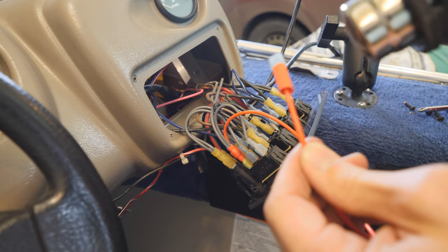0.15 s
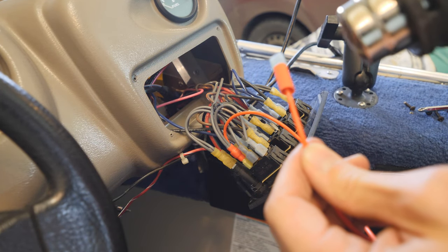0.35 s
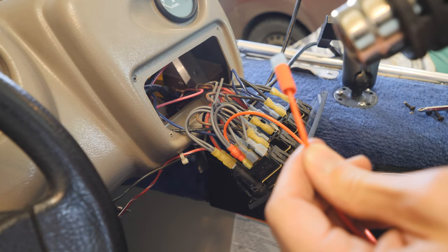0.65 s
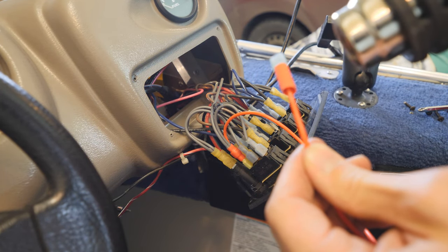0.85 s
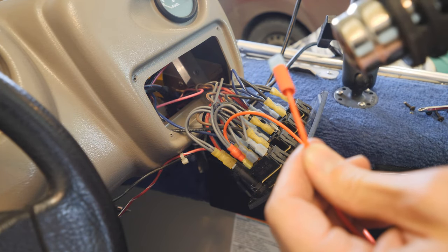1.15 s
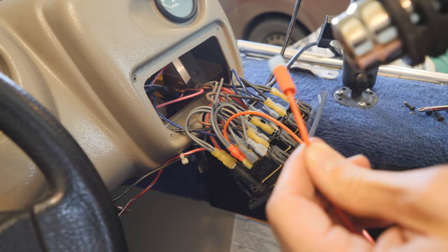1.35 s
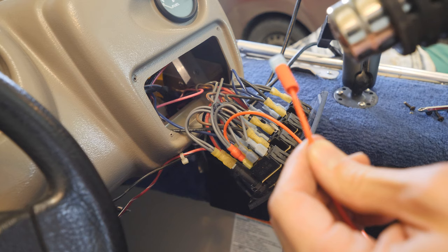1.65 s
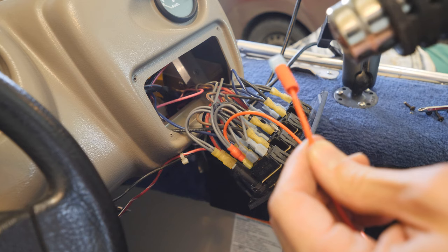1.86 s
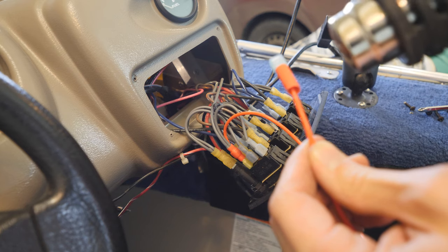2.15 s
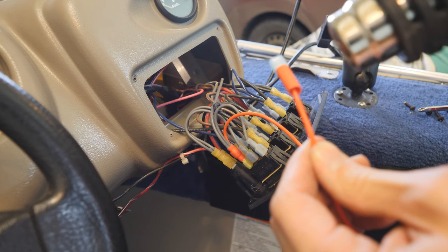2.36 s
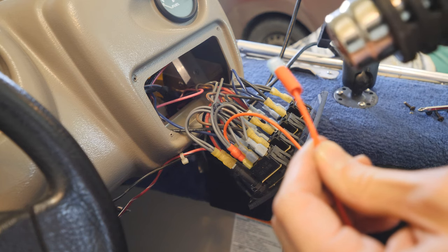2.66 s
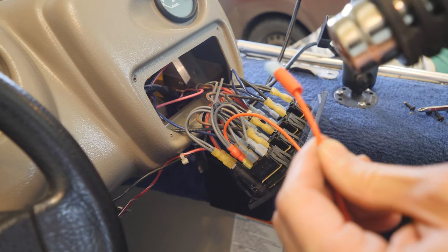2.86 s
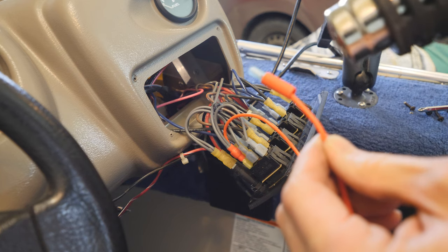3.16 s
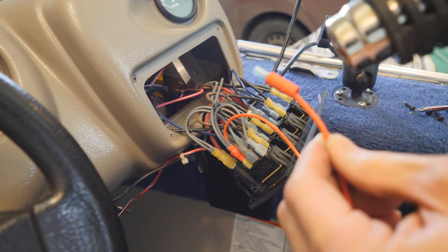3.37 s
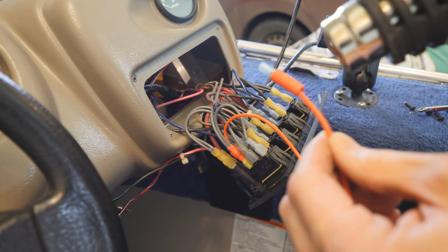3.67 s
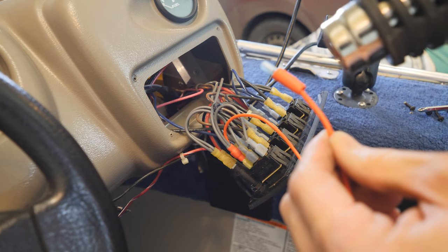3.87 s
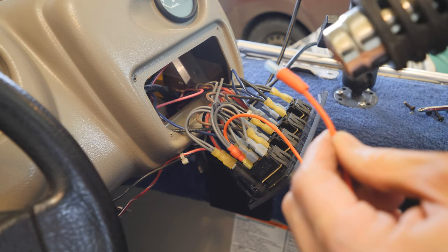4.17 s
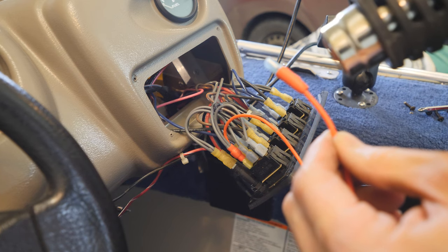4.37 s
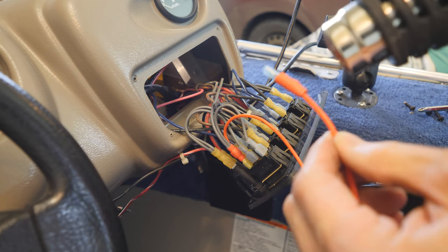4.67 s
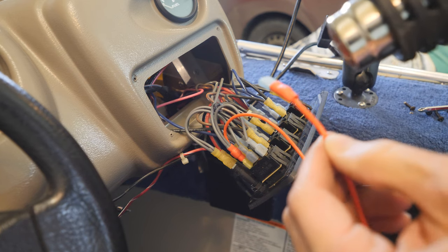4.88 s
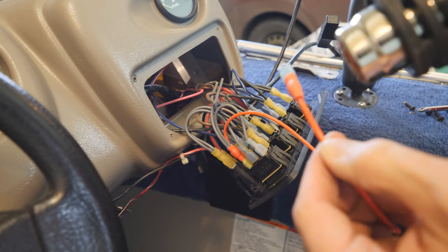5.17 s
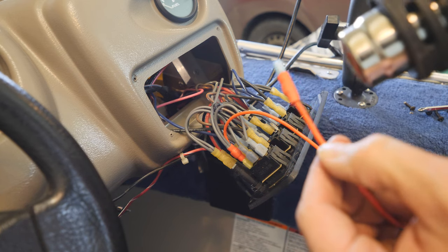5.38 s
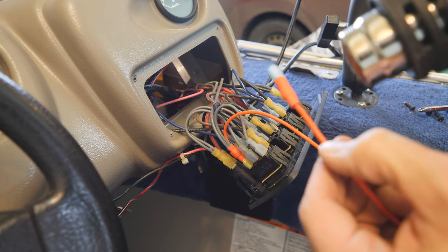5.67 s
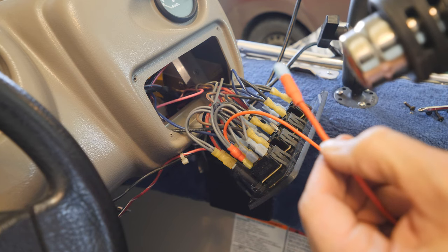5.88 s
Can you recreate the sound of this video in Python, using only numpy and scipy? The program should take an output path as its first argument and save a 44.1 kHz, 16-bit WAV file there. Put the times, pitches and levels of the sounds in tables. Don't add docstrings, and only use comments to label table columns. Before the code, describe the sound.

A hand-held heat gun, just switched on, blows close to the microphone in a boat cockpit. Its broad, breathy rush swells while a buzzy motor whine glides upward, quickly at first and then more slowly. Midway the nozzle turns away and the whine softens and changes colour, returning as it points back. The sound is dry, close, practically mono and continuous to the end.

```python
import sys
import numpy as np
from scipy import signal
from scipy.fft import rfft, irfft
from scipy.io import wavfile

SR = 44100
rng = np.random.default_rng(int(sys.argv[2]) if len(sys.argv) > 2 else 0)


def master(y):
    cut = np.clip(np.atleast_2d(y).T, -1, 1)
    pcm = np.round(cut * 32767)
    wavfile.write(sys.argv[1], SR, pcm.astype(np.int16))


def volts(x):
    e = np.asarray(x, float) / 20
    return 10 ** e


N = 265790

# f/Hz, level/dB
TURBULENCE = [(20, -63), (60, -33), (160, -23.5), (300, -17), (470, -20.5), (620, -9.5), (1500, -13),
              (2100, -15), (4000, -6.5), (4800, -12), (6300, -17.5), (7700, -28), (12800, -42.5),
              (16000, -47)]
# f/Hz, width/Hz, peak level/dB, trend/(dB/s), change at full tilt/dB
BARREL_MODES = [(789, 67, -6, 0.2, -1.3), (1111, 147, -5, -0.3, -1.3), (1317, 135, -4.5, 0.34, -0.2),
                (1838, 78, -9.5, 0.5, .1), (2418, 235, -9.5, -0.4, 0.3), (3036, 152, -0.86, -0.34, -0.8),
                (3572, 203, -3.5, 0.4, -2.5), (3843, 81, -3.5, 1.2, 2.3), (4243, 270, -7, -0.7, -9),
                (5085, 160, -14, -1, -2), (5440, 180, -8.5, 0, -1), (5614, 146, -14.5, 0.9, 6.5),
                (5945, 270, -11.5, -1.4, -0.5), (7210, 82, -20.5, -1, 1), (8470, 950, -28, 0.5, -2),
                (10800, 600, -41, 1, -4), (11700, 300, -35, 0, -2), (12200, 200, -44, 0, -2),
                (9230, 330, -37, 2, -2)]
ZONE_EDGES = (1600, 3300, 5000)
# level at full speed/dB, power of speed/1, change at full tilt/dB
ZONES = [
    (-26, 2.75, -0.55),
    (-26, 3.1, 0.5),
    (-27.8, 2.3, 0),
    (-31.5, 2, 0.6),
]
# t/s, tilt/1
TILT = [
    (0, 0),
    (2.8, 0),
    (3.6, 1),
    (4.7, 1),
    (5.2, 0),
    (6.03, 0),
]
# shaft multiple/1, level at mid time/dB, trend/(dB/s), change at full tilt/dB,
# share of the run-up loss/1
STEADY_TONES = [
    (1, -44.6, 1.1, 0.3, 1.2),
    (7, -34.6, 0.45, -1.2, 0.6),
]
# t/s, blade tone (12th) level/dB, 15th multiple level/dB
INLET = [(0.6, -33.5, -38), (1.1, -30, -36), (1.55, -31, -40), (1.7, -27, -44), (2.95, -27.5, -44),
         (3.2, -30, -43), (4.1, -33.5, -51), (4.3, -38.5, -52), (4.7, -36, -49), (5.0, -31, -46),
         (5.15, -27.5, -44), (5.5, -27, -37.5), (5.65, -30, -40), (6.03, -29, -39)]
# shaft multiple/1, level at mid time/dB, trend/(dB/s), change at full tilt/dB
WEAK_TONES = [(2, -52.5, 1.3, 3.5), (3, -63.2, -5.4, 12.2), (4, -47.0, 1.2, -5.5), (5, -38.6, 0.3, -0.7),
              (6, -44.5, -0.5, 0.6), (8, -44, 1.0, -3.2), (9, -62.9, 5.0, -17.1), (10, -48.7, 2.4, -1.7),
              (11, -45.4, -0.7, -2.0), (13, -42.5, -0.3, 4.5), (14, -51.8, 0.0, -7.2), (16, -45, 1.9, -3.7),
              (17, -64.0, 6.5, 3.7), (18, -55.5, 1.7, -0.3), (19, -54.4, 4.5, 2.0), (20, -55.1, 0.7, 7.7),
              (21, -48.3, 0.5, 1.7), (22, -52.7, -1.3, -12.5), (23, -54.1, -2.0, -12.7), (24, -53.5, -2, 5),
              (30, -60.3, 0.6, 0), (47, -73.5, 2.1, -9), (48, -75.5, -0.5, -3), (42, -73, -1.5, 0)]
# t/s, lowest f/Hz, highest f/Hz, level/dB
OPPOSITE_PUFFS = [(.434, 4200, 5200, -38.5), (.434, 9700, 11050, -63), (.689, 4620, 6240, -35),
                  (.968, 4200, 5250, -40), (.968, 13200, 14500, -66), (1.061, 4620, 5720, -40),
                  (1.943, 4200, 5720, -36), (1.943, 11050, 12400, -62), (2.919, 8270, 9700, -53),
                  (2.919, 14500, 15900, -70), (4.242, 4650, 5800, -37), (4.242, 14500, 15900, -69.5),
                  (5.728, 4620, 5720, -39), (5.728, 6900, 8270, -50), (5.751, 11750, 13200, -64),
                  (5.751, 14500, 15900, -70), (5.96, 6250, 7600, -50)]

FULL_SPEED_HZ = 286.888


def air_rush(sway_db):
    hz = np.fft.rfftfreq(N, 1 / SR) + 1
    table_hz, table_db = np.transpose(TURBULENCE)
    spectrum = volts(np.interp(np.log(hz), np.log(table_hz), table_db))
    air = irfft(rfft(rng.standard_normal(N)) * spectrum, N)

    inlet = rng.standard_normal(N)
    for k, (mode_hz, width_hz, *aim) in enumerate(BARREL_MODES):
        section_hz = 1.42 * width_hz
        ringing = resonance(inlet, mode_hz, section_hz)
        ringing = resonance(ringing, mode_hz, section_hz)
        sign = (-1) ** k
        air += sign * ringing * volts(aimed(*aim) + sway_db * drift(0.52))

    whole = rfft(air)
    below = [0] + [1 / (1 + (hz / edge) ** 16) for edge in ZONE_EDGES] + [1]
    speed_db = 20 * np.log10(shaft_hz() / FULL_SPEED_HZ)
    rush = np.zeros(N)
    for foot, top, (db, power, tilt_db) in zip(below, below[1:], ZONES):
        zone = rms_one(irfft(whole * (top - foot), N))
        rush += volts(aimed(db, 0, tilt_db) + power * speed_db) * zone
    return rush


def rotor(wander_db, flutter_db):
    speed = shaft_hz()
    angle = 2 * np.pi * np.cumsum(speed) / SR
    angle += .012 * drift(6)
    slack_db = 60 * np.log10(speed / speed[-1])

    blades_db, fifteenth_db = in_time(INLET)
    off = (12 * speed - 3050) / 95
    blades_db = blades_db + 6.3 * np.exp(-off ** 2)
    blades_db = blades_db - 7 * np.clip(-off / 2.5, 0, 1) ** 2

    # multiple, level in dB, relative flutter
    strong = [(k, aimed(*aim) + share * slack_db, 1) for k, *aim, share in STEADY_TONES]
    strong += [(12, blades_db, 1.5), (15, fifteenth_db, 5)]
    tones = np.zeros(N)
    for k, db, shaky in strong:
        tones += volts(db + shaky * flutter_db * drift(12)) * np.sin(k * angle + k)

    for k, *aim in WEAK_TONES + commutator_comb():
        high = k / 50
        wander = wander_db * (.6 + .3 * high) * drift(1.2)
        level = volts(aimed(*aim) + slack_db + .8 * high + wander)
        tones += level * np.sin(k * angle + 2 * np.pi * rng.random())
    return np.sqrt(2) * tones


def commutator_comb():
    first, last = 25, 55
    scatter_db, tilt_db = 2.2, -3
    listed = [k for k, *aim in WEAK_TONES]
    comb = []
    for k in range(first, last + 1):
        if k not in listed:
            db = -64.5 - .56 * (k - first) + scatter_db * rng.standard_normal()
            comb.append((k, db, 0, tilt_db))
    return comb


def opposite_noise():
    frame, grid = 2048, 704
    half = frame // 2
    out = np.zeros(N + frame)
    window = signal.windows.kaiser_bessel_derived(frame, 4 * np.pi)
    for s, low_hz, high_hz, db in OPPOSITE_PUFFS:
        lines = np.arange(int(low_hz / SR * frame), int(high_hz / SR * frame)) + .5
        shapes = np.cos(np.pi / half * np.outer(np.arange(frame) + .5 + half / 2, lines))
        puff = shapes @ rng.standard_normal(len(lines))
        start = grid + half * (round((s * SR - grid) / half) - 1)
        out[start:start + frame] += volts(db + 1.5) * rms_one(puff) * window
    return out[:N]


def shaft_hz():
    t = np.arange(N) / SR
    quick_hz = 28.779 * np.exp(-t / .435)
    slow_hz = 17.19 * np.exp(-t / 1.65)
    sag_hz = .699 * np.maximum(t - 4.349, 0)
    return FULL_SPEED_HZ - (quick_hz + slow_hz) - sag_hz


def aimed(db, trend, tilt_db):
    from_middle_s = np.clip((np.arange(N) - N / 2) / SR, -2.5, 2.5)
    return db + trend * from_middle_s + tilt_db * in_time(TILT)[0]


def resonance(x, hz, width_hz):
    r = np.exp(-np.pi * width_hz / SR)
    zeros = np.array([1, 0, -1]) * (1 - r * r) / 2
    poles = [1, -2 * r * np.cos(2 * np.pi * hz / SR), r * r]
    return signal.lfilter(zeros, poles, x)


def drift(rate_hz):
    r = np.exp(-200 * np.pi * rate_hz / SR)
    coarse = rng.standard_normal(N // 100 + 2002)
    slow = signal.lfilter([1], [1, -2 * r, r * r], coarse)[2000:]
    return np.interp(np.arange(N) / 100, np.arange(len(slow)), rms_one(slow))


def in_time(rows):
    s, *columns = np.transpose(rows)
    return [np.interp(np.arange(N) / SR, s, c) for c in columns]


def rms_one(x):
    return x / np.sqrt(np.mean(x ** 2) + 1e-20)


def scene():
    gun = rotor(wander_db=3.5, flutter_db=0.46) + air_rush(sway_db=.5)
    in_band = np.fft.rfftfreq(N, 1 / SR) < 15730
    gun = irfft(rfft(gun) * in_band, N)
    return gun + opposite_noise() * [[1], [-1]]


def roll_off(x):
    return signal.sosfilt(signal.butter(12, 15990, fs=SR, output="sos"), x)


def record(dry):
    return roll_off(dry)


dry = scene()
out = record(dry)
master(out)
```